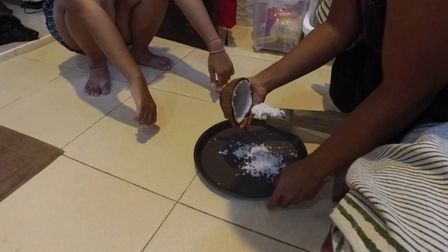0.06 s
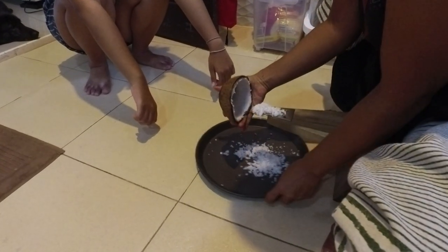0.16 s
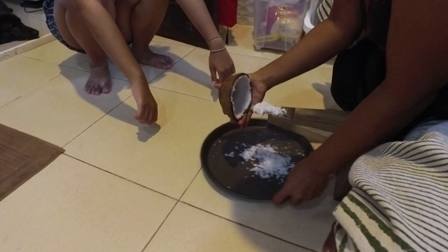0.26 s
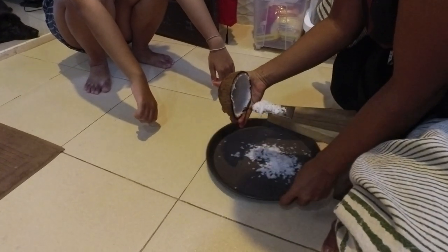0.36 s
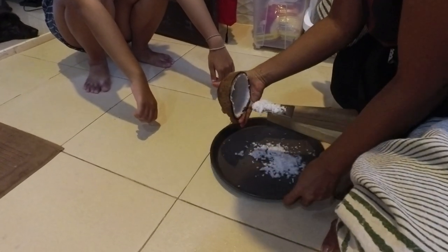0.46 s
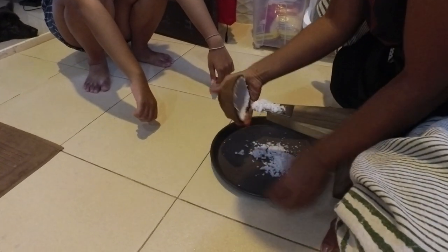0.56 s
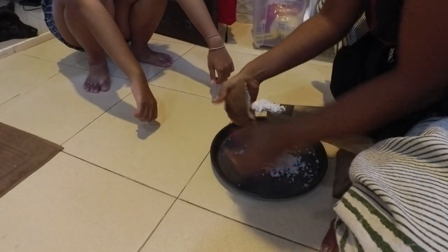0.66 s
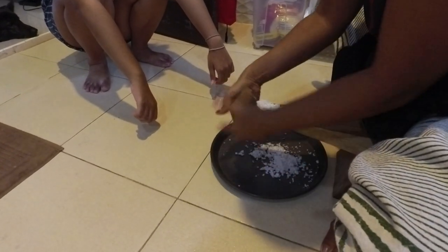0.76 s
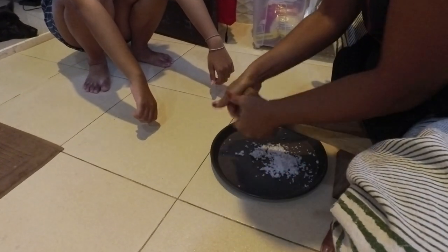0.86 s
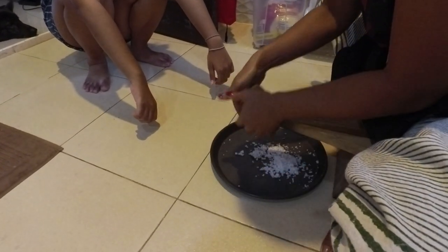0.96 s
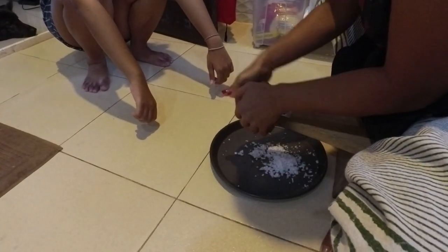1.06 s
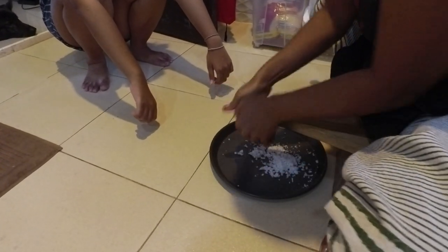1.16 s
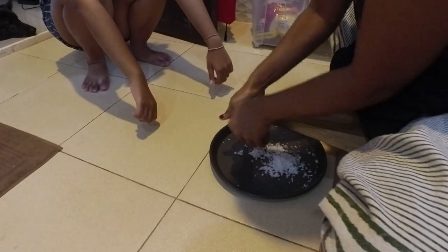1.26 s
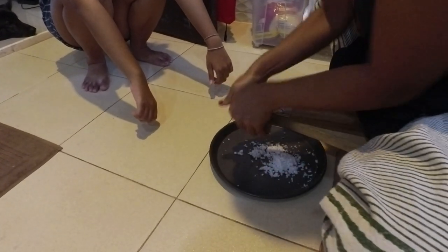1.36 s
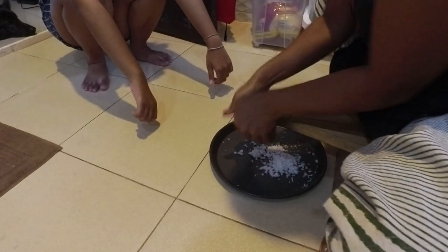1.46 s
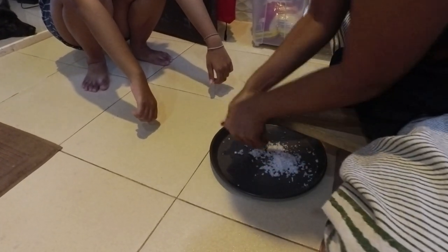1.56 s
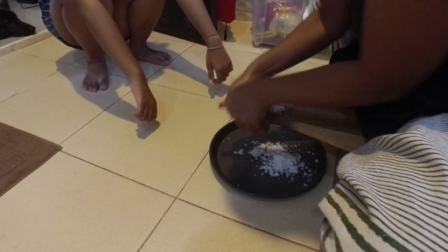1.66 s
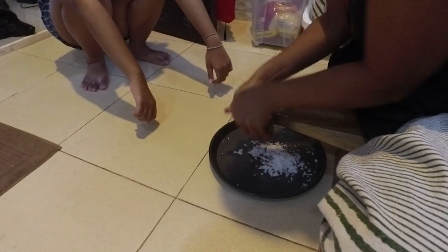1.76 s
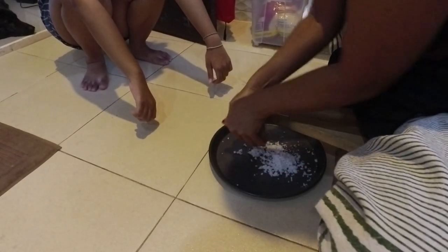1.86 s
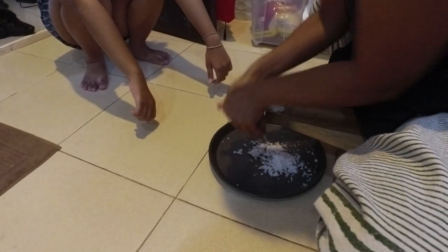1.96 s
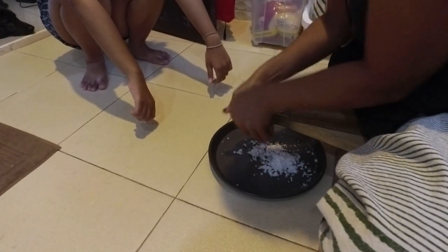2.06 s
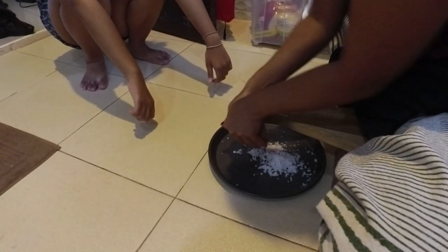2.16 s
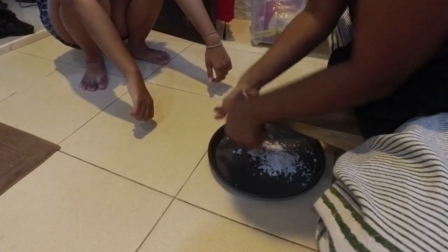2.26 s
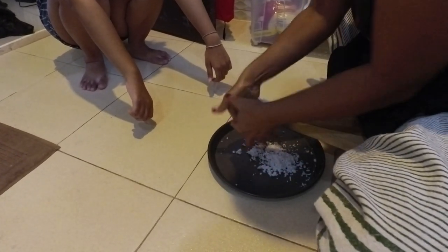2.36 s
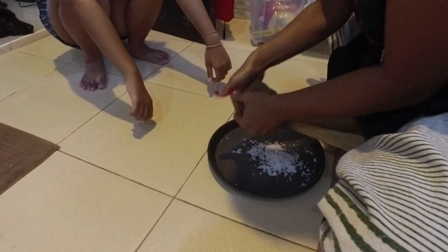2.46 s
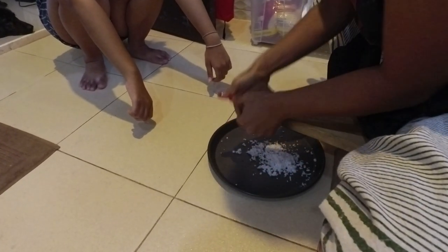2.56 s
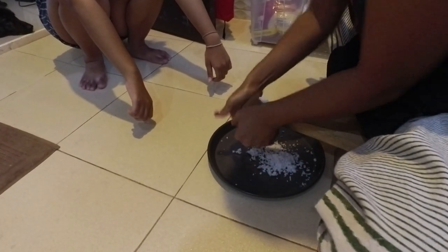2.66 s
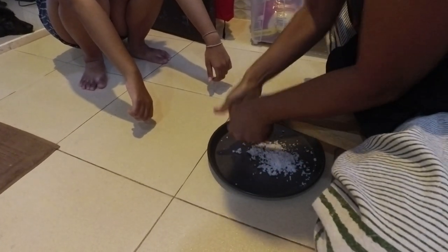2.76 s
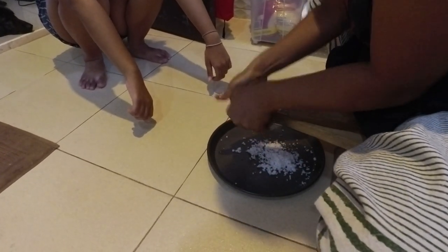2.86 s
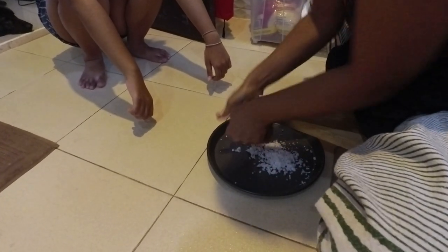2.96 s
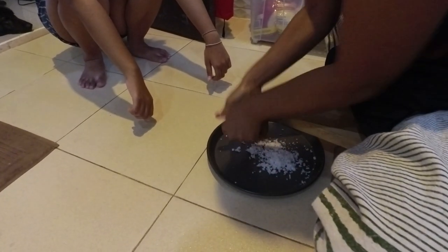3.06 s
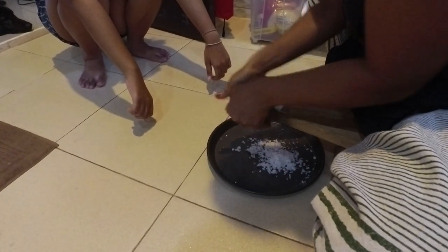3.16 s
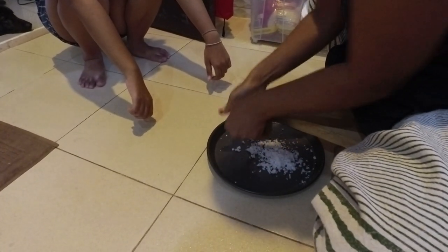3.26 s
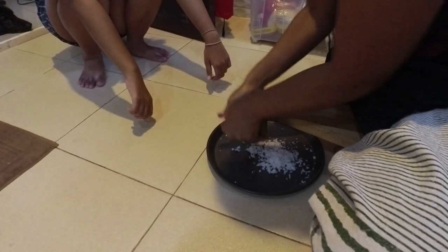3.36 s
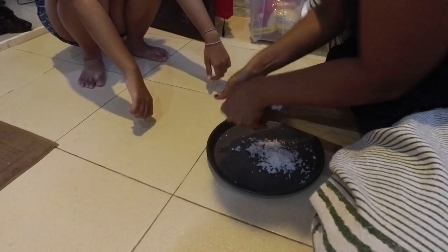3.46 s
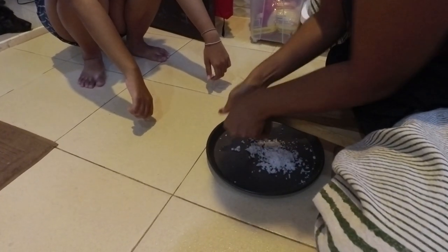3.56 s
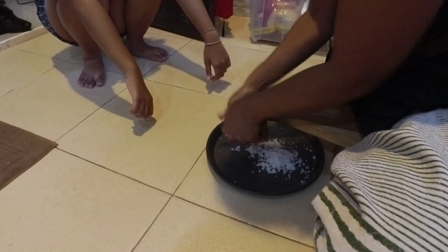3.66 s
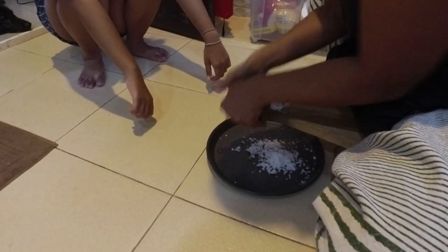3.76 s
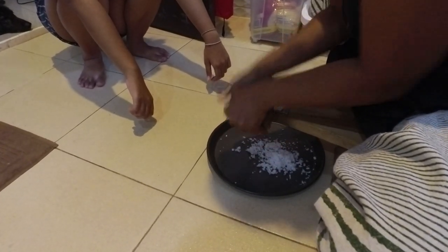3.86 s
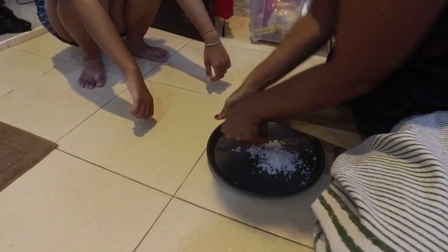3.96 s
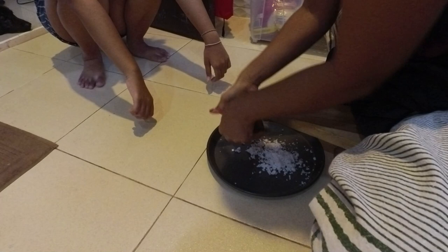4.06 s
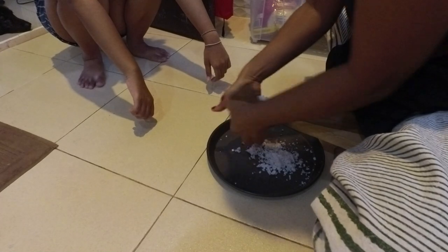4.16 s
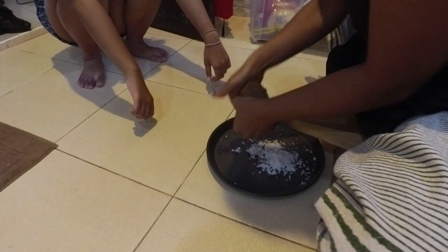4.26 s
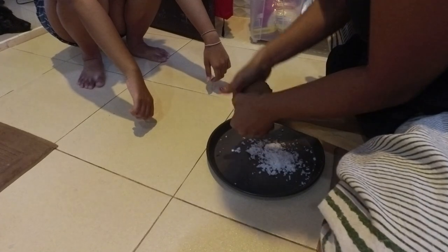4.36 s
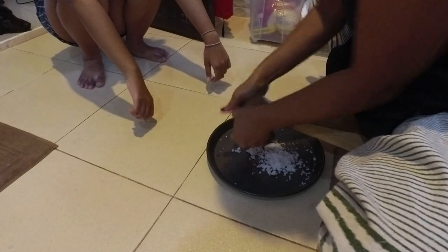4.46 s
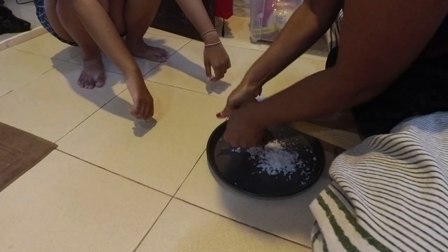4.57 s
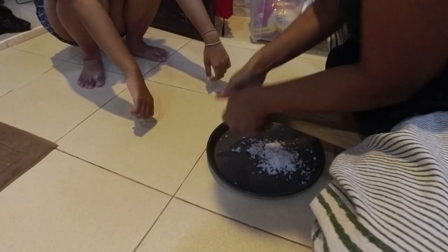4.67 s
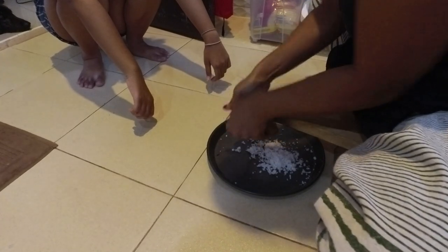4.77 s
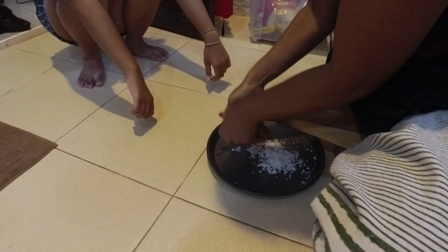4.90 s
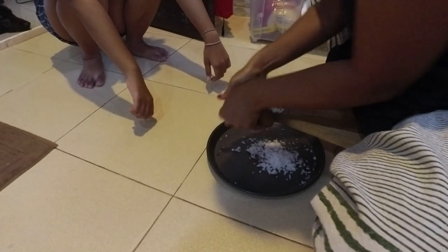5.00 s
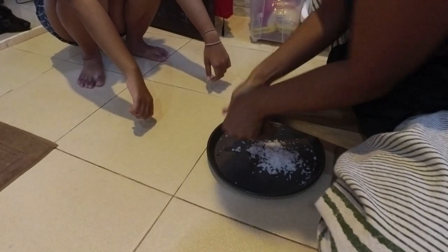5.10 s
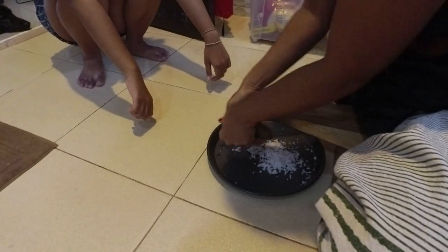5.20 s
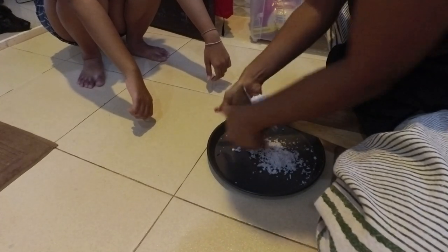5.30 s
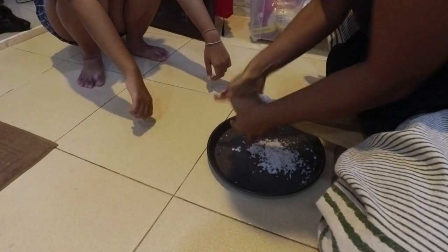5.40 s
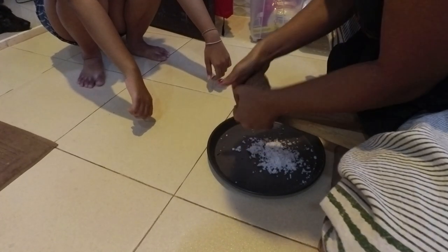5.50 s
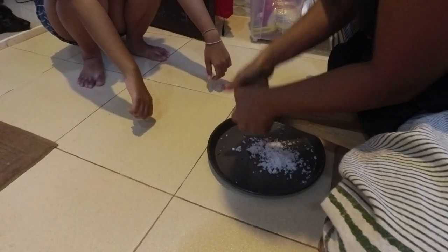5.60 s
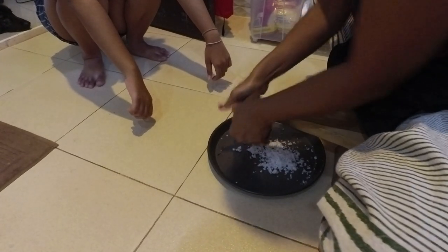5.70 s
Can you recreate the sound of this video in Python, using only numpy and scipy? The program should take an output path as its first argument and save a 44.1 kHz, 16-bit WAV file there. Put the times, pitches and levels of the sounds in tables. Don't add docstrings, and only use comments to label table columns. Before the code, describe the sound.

A metal plate scrapes grittily over kitchen tiles, then coconut flesh rasps in quick, hollow strokes against a toothed steel blade.

```python
import sys
import numpy as np
from scipy import signal
from scipy.fft import rfft, irfft, next_fast_len
from scipy.io import wavfile
from scipy.ndimage import map_coordinates

SR = 44100
rng = np.random.default_rng(int(sys.argv[2]) if len(sys.argv) > 2 else 0)


def pcm_store(signal):
    levels = np.round(np.clip(np.atleast_2d(signal), -1, 1) * 32767)
    wavfile.write(sys.argv[1], SR, levels.astype(np.int16).T)


def gain_from_db(level_db):
    decades = np.asarray(level_db, float) / 20
    return 10 ** decades


N = 253045
TIME = np.arange(N) / SR


def unit(x):
    return x / np.sqrt(np.mean(x ** 2) + 1e-20)


def unit_gain(response):
    return response / np.sqrt(np.mean(abs(response) ** 2))


def along(points, hz):
    f, v = np.transpose(points)
    return np.interp(np.log(hz + 1), np.log(f + 1), v)


def curves(rows):
    s, *columns = np.transpose(rows)
    return [np.interp(TIME, s, column) for column in columns]


def wobble(rate):
    knots = rng.standard_normal(int(N * 300 / SR))
    return map_coordinates(knots, [TIME * rate])


def filtered(x, response):
    m = next_fast_len(N + SR // 2)
    spectrum = rfft(x, m) * response(np.fft.rfftfreq(m, 1 / SR))
    return irfft(spectrum, m)[..., :N]


def coloured(x, spectrum):
    return unit(filtered(x, lambda hz: gain_from_db(along(spectrum, hz))))


def ringing(x, modes):
    def body(hz):
        total = 0
        for k, (centre, width, db) in enumerate(modes):
            damping = 1j * hz * width
            total = total + (-1) ** k * gain_from_db(db) * damping / (centre ** 2 - hz ** 2 + damping)
        return unit_gain(total)
    return filtered(x, body)


def slips(rate, spread_db, smooth, clump_db):
    chance, size = rng.random(N), rng.uniform(-0.46, 1, N)
    sign = np.sign(rng.standard_normal(N))
    kicks = unit((chance < rate / SR) * gain_from_db(spread_db * size) * sign)
    clumps = gain_from_db(clump_db * (wobble(45) + wobble(140)))
    return unit((kicks + smooth * rng.standard_normal(N)) * clumps)


# t/s, rim level/dB, bottom level/dB
PLATE_DRAG = [
    (0.0, -65, -49),
    (0.1, -55, -45),
    (0.202, -39, -40.5),
    (0.3, -35, -47.5),
    (0.385, -33.5, -41),
    (0.5, -37.5, -47.5),
    (0.56, -45, -58),
    (0.66, -50.5, -78),
    (1.06, -52.5, -54),
]
# f/Hz, width/Hz, level/dB
RIM_MODES = [(1540, 76, 2), (1690, 53, -8), (1870, 120, 8), (2350, 67, 5.5), (2560, 61, -2),
             (2694, 72, 6.5), (2970, 47, -5), (3700, 140, -13), (4320, 100, -5), (4970, 340, -20)]
# f/Hz, width/Hz, level/dB
FLAT_MODES = [(453, 33, -5), (490, 37, 3), (544, 71, 1), (960, 64, -7.5), (1743, 60, -10),
              (1940, 160, -8.5), (2140, 88, -12.5)]
# f/Hz, width/Hz, level/dB
TILTED_MODES = [(681, 39, 1), (880, 27, -7)]
# f/Hz, level/dB
GRIT_SPECTRUM = [(590, -40), (1000, -8), (1860, -6), (2620, 1), (3370, -3.5), (4390, -5.5), (10100, -14.5),
                 (15500, -34)]


def plate():
    rim_db, bottom_db = curves(PLATE_DRAG)
    tilt = .5 + .5 * np.tanh((TIME - 0.29) / 0.046)
    grit_db = -3 + 0.54 * (rim_db - rim_db.max())
    moving = TIME < 1.06
    drag = moving * slips(rate=3300, spread_db=10.5, smooth=1.0, clump_db=0.0)
    rim = ringing(gain_from_db(rim_db - 6.5) * drag, RIM_MODES)
    push = gain_from_db(bottom_db + 1.5 * wobble(25)) * drag
    flat = ringing(push * (1 - 1.08 * tilt), FLAT_MODES)
    tilted = ringing(push * tilt, TILTED_MODES)
    grit = moving * gain_from_db(rim_db + grit_db + 2.5) * coloured(rng.standard_normal(N), GRIT_SPECTRUM)
    return rim + flat + tilted + grit


# f/Hz, level/dB
AIR_SPECTRUM = [(12, -49), (20, -11.5), (109, -5.5), (176, -10.5), (372, -2), (883, -4.5), (1040, -5.5),
                (1460, -6.5), (2690, -16.5), (3270, -17), (8430, -24), (11500, -30), (15600, -51)]


def air():
    drift_db = .5 * wobble(2.55) + .7 * wobble(5.1)
    return gain_from_db(-50.5 + drift_db) * coloured(rng.standard_normal(N), AIR_SPECTRUM)


# t/s, peak level/dB, f/Hz, t60/s
CLICKS = [
    (.637, -37, 9000, 0.0056),
    (2.517, -56, 2200, .12),
    (3.153, -32, 7340, 0.0071),
    (3.1535, -34, 8250, 0.0085),
    (2.842, -37, 4030, 0.013),
    (3.154, -39, 4400, .008),
    (3.687, -25.5, 3520, 0.0099),
    (3.78, -31, 2650, 0.023),
    (5.49, -39, 4000, 0.0083),
]


def ticks():
    out, t = np.zeros(N + SR), np.arange(SR // 10) / SR
    for s, db, hz, t60 in CLICKS:
        swell = (1 - np.exp(-t / 0.00031)) * gain_from_db(db - 60 * t / t60)
        out[round(s * SR):][:len(t)] += swell * np.sin(2 * np.pi * hz * t)
    return out[:N]


# start t/s, end t/s, f/Hz, level/dB
STOOL_CREAK = (.9, 1.07, 210, -55)


def creak():
    start, end, hz, db = STOOL_CREAK
    swell = np.sin(np.pi * np.clip((TIME - start) / (end - start), 0, 1))
    return gain_from_db(db) * swell * np.sin(2 * np.pi * hz * TIME + .5 * wobble(30))


# catch t/s, build-up/s, hold/s, full pressure level/dB, catch level re full/dB
CUTTING_STROKES = [(1.083, 0.084, 0.054, -28, -12.5), (1.426, 0.046, 0.06, -27.5, -11.5),
                   (1.74, 0.041, 0.053, -26, -9.5), (2.055, 0.043, 0.048, -26, -7.5),
                   (2.573, 0.035, 0.075, -28, -16.5), (2.894, 0.048, 0.057, -28.5, -9),
                   (3.213, 0.072, 0.032, -25, -6), (3.514, 0.04, 0.066, -26.5, -11),
                   (3.866, 0.039, 0.043, -25, -7), (4.42, 0.014, 0.091, -30, -4.5),
                   (4.738, 0.039, 0.076, -28.5, -5.5), (5.05, 0.039, 0.062, -24, -13.5),
                   (5.589, 0.062, 0.091, -25.5, -17.5)]
# t/s, half length/s, level/dB
RETURN_GRAZES = [
    (2.522, 0.086, -53),
    (2.841, 0.013, -44),
    (3.155, 0.012, -52),
    (3.467, 0.013, -46.5),
    (3.77, 0.09, -50),
    (4.14, 0.063, -59),
    (4.307, 0.046, -53),
    (4.695, 0.011, -51),
    (5.0, 0.016, -58),
    (5.49, 0.074, -48),
]


def pressure():
    start, build, hold, full_db, catch_db = np.array(CUTTING_STROKES).T[:, :, None]
    age = TIME - start
    after = np.maximum(age - build - hold, 0)
    early = np.minimum(age, 0)
    rise_db = catch_db * (1 - np.clip(age / build, 0, 1))
    land = np.maximum(gain_from_db(2500 * early), gain_from_db(-9 + 347 * early))
    fall = gain_from_db(-219 * after) + gain_from_db(-16 - 88 * after)
    cut = (gain_from_db(full_db + rise_db) * land * fall).sum(axis=0)
    graze = sum(gain_from_db(db) * np.exp(-.5 * ((TIME - s) / half) ** 2) for s, half, db in RETURN_GRAZES)
    shell_db = 20 * np.log10(cut + graze + 1e-5)
    stroke = np.clip(np.searchsorted(start[:, 0] - .006, TIME) - 1, 0, None)
    slack_db = np.clip(full_db[stroke, 0] - shell_db, 0, 40)
    return shell_db, slack_db, np.maximum(TIME - start[stroke, 0], 0), stroke


# f/Hz, width/Hz, level/dB
SHELL_MODES = [(598, 32, -2.5), (667, 44, -1), (726, 30, 1.5), (807, 40, -1)]
# f/Hz, width/Hz, level/dB
LIP_MODES = [(961, 56, -2), (1024, 33, 2.5), (1112.5, 47, 1.5), (1185, 96, -7.5), (1347, 72, -4.5),
             (1537, 31, -6), (1667, 92, -10), (1720, 46, -20.5)]
# f/Hz, width/Hz, level/dB
CUP_MODES = [(285, 246, -17), (368.2, 48.6, -0.5), (408, 18.6, 3), (467, 48.7, 0.5), (530, 108, -4.5)]
# f/Hz, width/Hz, level/dB
BLADE_MODES = [(2052, 25, 3.5), (2148, 23, 2.5), (2170, 99, -10), (2270, 40, 1.5), (2330, 44, -5),
               (2460, 82, -8), (2640, 45, -6.5), (2780, 27, 0.5), (2755, 86, -3), (2890, 48, -12),
               (3410, 150, -8.5)]
# f/Hz, level/dB
SHREDS_SPECTRUM = [(710, -23), (1200, -1.5), (1340, -8), (1460, -8), (2620, -2.5), (3250, -12),
                   (3500, -12.5), (7410, -15.5), (11400, -23.5), (13500, -31), (15500, -49)]
# f/Hz, level/dB
STOOL_SPECTRUM = [(18, -48), (30, -30), (135, -2), (184, -50), (300, -4), (390, -43), (660, -120)]
# cup opened level/dB, contact towards lip level/dB, blade level/dB, shreds level/dB
STROKE_GRIPS = [(0.5, 1, 0.5, 0.5), (-1.5, -2, -1.5, 0.5), (-1.5, 3, -0.5, -0.5), (-1.5, -0.5, -3, 1),
                (4.5, 4, 4, 2), (0, 0, 0.5, 2), (-1, 0, 2, -1.5), (1, -1, 1.5, 0), (-3, 1.5, 1, 0.5),
                (0, 3.5, 3, 0), (1, 2, -2, -0.5), (-4.5, 0, -1, -3), (-0.5, 1, 1, -2)]
# t/s, level/dB, half length/s
TEETH_SKIPS = [
    (3.575, -10.5, 0.0064),
    (3.275, -1, .012),
    (2.07, 2, .01),
    (4.76, 1, 0.011),
    (1.13, 1.5, 0.015),
]


def grating():
    shell_db, slack_db, age, stroke = pressure()
    open_db, lip_db, steel_db, spray_db = np.array(STROKE_GRIPS)[stroke].T
    free = np.exp(-age / 0.067)
    cup_db = -13 + 13 * free + open_db + 1.5 * wobble(12)
    blade_db = -8.5 + 12.5 * free + steel_db + 0.32 * slack_db + 0.75 * wobble(15)
    shreds_db = -12.5 + 0.22 * slack_db + spray_db
    lip_db = lip_db + 1.5 * wobble(12)
    hold_db = sum(db * np.exp(-.5 * ((TIME - s) / half) ** 2) for s, db, half in TEETH_SKIPS)
    push = gain_from_db(shell_db + hold_db) * (TIME > 1.0)
    tear = slips(rate=1200, spread_db=3, smooth=0.91, clump_db=1.5)
    fine = slips(rate=2500, spread_db=8, smooth=0.6, clump_db=1.5)
    spray = slips(rate=5000, spread_db=-0.5, smooth=1.13, clump_db=1.16)
    shell = ringing(push * gain_from_db(-3.0 - lip_db / 2) * tear, SHELL_MODES)
    lip = ringing(push * gain_from_db(-4.5 + lip_db / 2) * tear, LIP_MODES)
    cup = ringing(push * gain_from_db(cup_db - 0.82) * tear, CUP_MODES)
    blade = ringing(push * gain_from_db(blade_db - 8.5) * fine, BLADE_MODES)
    stool_db = -26 + 0.23 * cup_db - 27 * age
    stool = push * gain_from_db(stool_db) * coloured(tear, STOOL_SPECTRUM)
    shreds = push * gain_from_db(shreds_db + 6) * coloured(spray, SHREDS_SPECTRUM)
    return shell + lip + cup + blade + stool + shreds


# t/s, peak level/dB, bright level re peak/dB
TEETH_BITES = [(1.085, -21, -21), (1.436, -16, -16), (1.734, -37, -17), (2.047, -12.5, -13),
               (2.582, -14.5, -15), (2.898, -14.5, -25), (3.218, -12.5, -30), (3.52, -28, -22),
               (3.58, -14.5, -7), (3.866, -29, -25), (4.427, -27, -22.5), (4.686, -26.5, -18),
               (4.737, -10.5, -30.5), (5.053, -27, -27), (5.584, -36, -22)]
# f/Hz, width/Hz, level/dB
LEG_MODES = [(88, 54, 6), (149, 23, 33), (205, 36, -44)]


def bites():
    knocks, cracks = np.zeros(N), np.zeros(N + SR)
    t = np.arange(SR // 20) / SR
    for s, db, bright_db in TEETH_BITES:
        first = round(s * SR)
        knocks[first] = gain_from_db(db)
        swell = gain_from_db(db + bright_db + 8 - 60 * t / 0.015) * (1 - np.exp(-t / .0015))
        cracks[first:][:len(t)] += swell * rng.standard_normal(len(t))
    knocks = filtered(knocks, lambda hz: 1 / (1 + 1j * hz / 1500) ** 2)
    hollow = gain_from_db(11) * ringing(knocks, CUP_MODES + SHELL_MODES + LIP_MODES)
    thump = gain_from_db(-9) * ringing(knocks, LEG_MODES)
    crack = filtered(cracks[:N], lambda hz: hz / (hz + 2500) * gain_from_db(along(SHREDS_SPECTRUM, hz) / 2))
    return hollow + thump + crack


# f/Hz, t60/s
KITCHEN_DECAYS = [(200, 0.29), (1000, 0.33), (4000, 0.34), (12000, 0.13)]


def room(x):
    hz, t, z = signal.stft(rng.standard_normal(SR // 2), SR, nperseg=256)
    decay = gain_from_db(-60 * t / along(KITCHEN_DECAYS, hz)[:, None])
    tail = signal.istft(z * decay, SR, nperseg=256)[1]
    return signal.fftconvolve(x, tail / np.linalg.norm(tail))[:N]


def scattered(x):
    z = signal.stft(x, nperseg=512)[2]
    phases = np.exp(2j * np.pi * rng.random(z.shape))
    return signal.istft(abs(z) * phases, nperseg=512)[1][:N]


# f/Hz, level/dB
STROKE_TREBLE = [(11500, -1.5), (12500, -6.5), (13500, -14), (15500, -2)]
# f/Hz, side re mid level/dB
SIDE_RESPONSE = [(60, -25), (110, -26), (200, -32), (380, -29), (700, -39), (1290, -32.5), (2380, -25),
                 (4400, -18.5), (8120, -13), (15000, -6)]
# f/Hz, level/dB
PORT_NOISE = [(12, -69), (20, -39), (270, -13), (693, -9), (2410, -14), (2620, -12), (7720, -13),
              (11400, -15), (15000, -41)]


def scene():
    strokes = filtered(grating() + bites(), lambda hz: gain_from_db(along(STROKE_TREBLE, hz)))
    near = strokes + ticks() + plate()
    mid = gain_from_db(-0.75) * near + gain_from_db(-8.5) * room(near) + creak() + air()
    side = filtered(gain_from_db(-0.2) * scattered(mid), lambda hz: gain_from_db(along(SIDE_RESPONSE, hz)))
    side += gain_from_db(-73.0) * coloured(rng.standard_normal(N), PORT_NOISE)
    return np.array([mid + side, mid - side])


def low_pass(x):
    return signal.sosfilt(signal.butter(12, 15710, fs=SR, output="sos"), x)


def record(dry):
    return low_pass(dry)


dry = scene()
out = record(dry)
pcm_store(out)
```